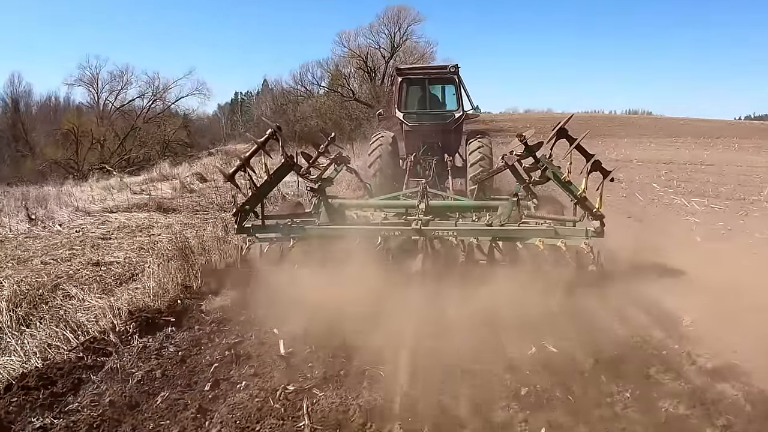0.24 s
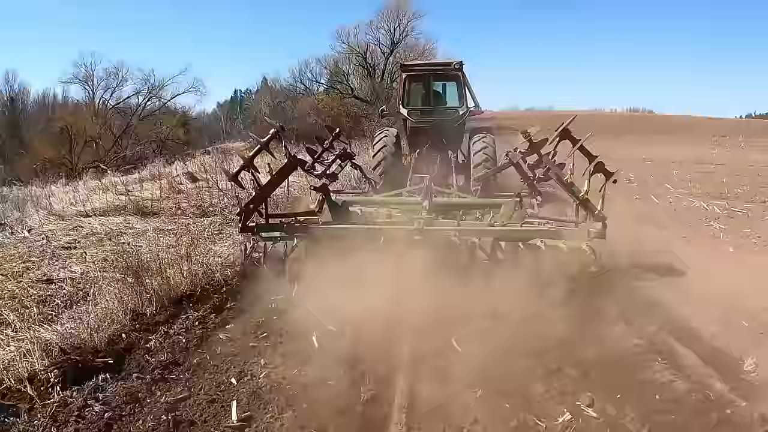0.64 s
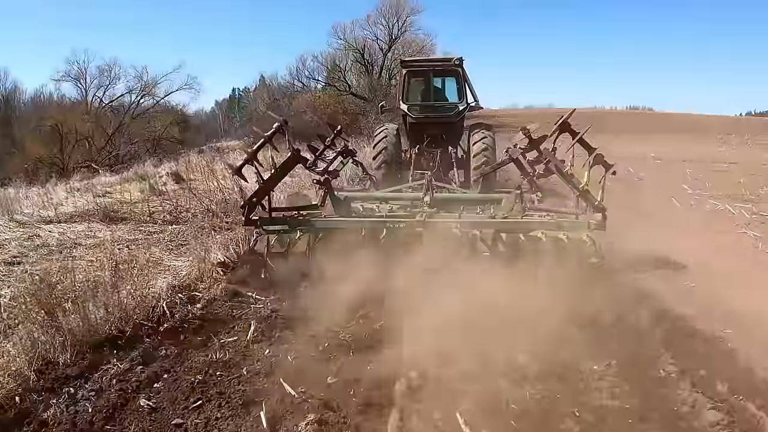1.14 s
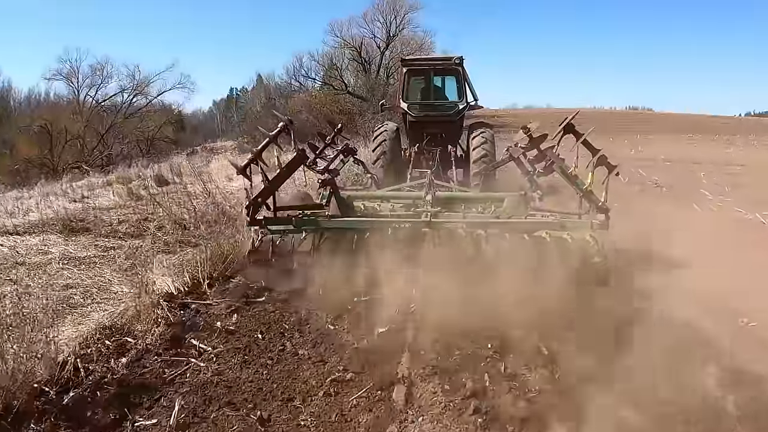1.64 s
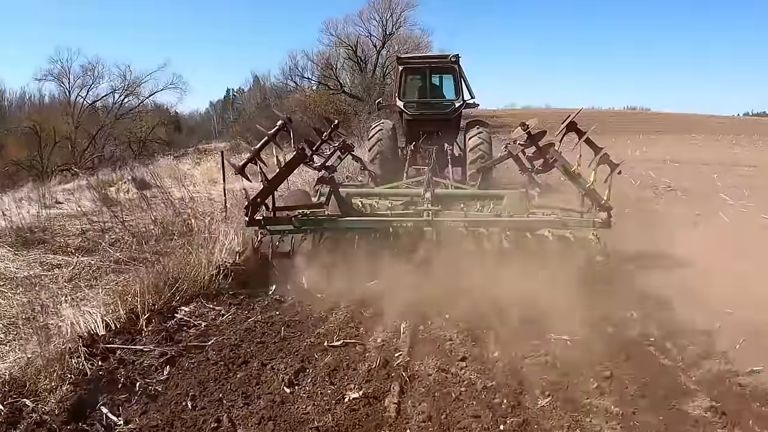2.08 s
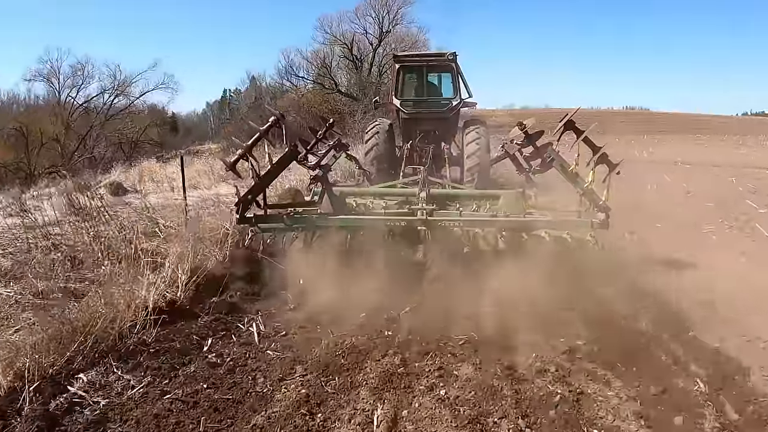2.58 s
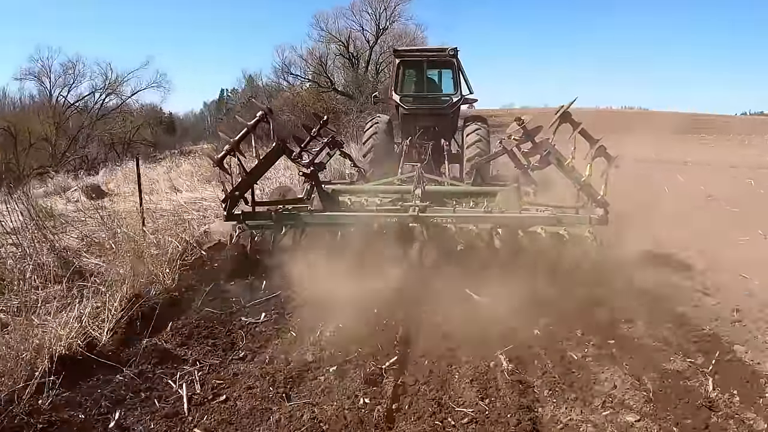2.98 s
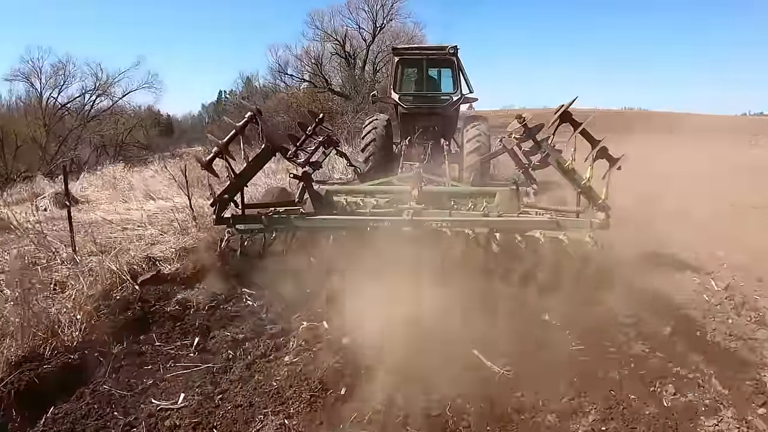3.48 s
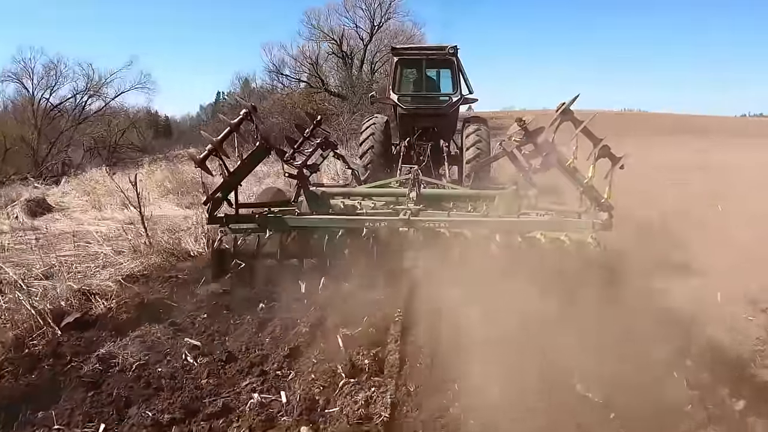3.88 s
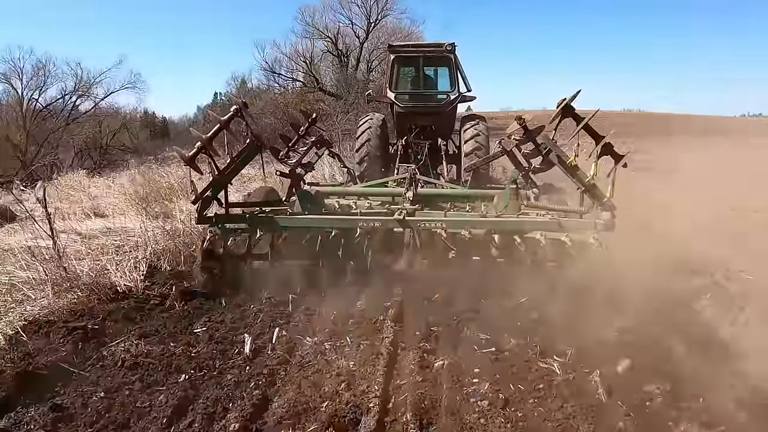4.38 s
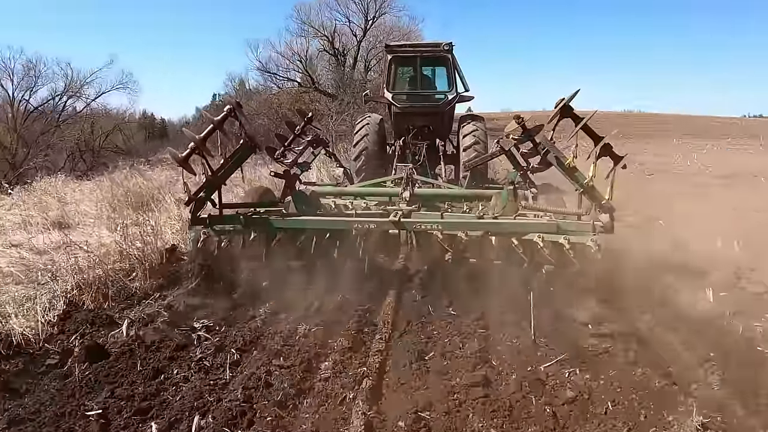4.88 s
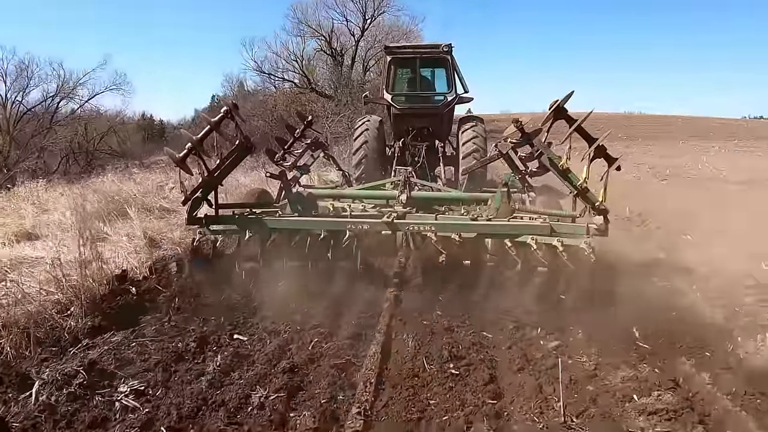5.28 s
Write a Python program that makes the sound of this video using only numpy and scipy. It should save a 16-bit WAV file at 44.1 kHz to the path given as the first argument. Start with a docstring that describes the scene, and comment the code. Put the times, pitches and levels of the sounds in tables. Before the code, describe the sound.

Continuous heavy engine hum with muffled clatter and faint whines underlies a nearby single-cylinder thump. Over it, gritty soil streams from a dragged disc harrow, fullest at first and sparser towards the end. Irregular hard knocks and tiny ticks run throughout; metallic clanks, crunching rasps and brief bearing squeaks come and go, then big stones thud dully near the end. Close moving stereo microphone in open air, no echo, slight wind.

```python
"""A diesel tractor drags a disc harrow over a dry field; the microphone follows on a small vehicle.
From the start the tractor's firing drone, clatter and whines beat against a one-cylinder engine picking up speed.
Filtered noise bursts pour off the discs as soil, thinning towards the end; pebbles tick and a little wind rumbles.
Noise bursts knock the frame throughout; from 0.3 s modal clanks, falling rasps, scraped discs and bearing squeaks
come and go. Around 4.6 s big stones bang dully against the gangs."""
import sys
import numpy as np
from scipy import signal
from scipy.fft import rfft, irfft, next_fast_len
from scipy.io import wavfile
from scipy.ndimage import uniform_filter1d, minimum_filter1d

SR = 44100
rng = np.random.default_rng(int(sys.argv[2]) if len(sys.argv) > 2 else 0)


def digitize_waveform(pressure):
    """Quantize a signal to 16-bit integers and store it at the path in sys.argv[1].

    Rows of a 2-D input are taken as channels; values are limited to [-1, 1].
    """
    field = np.atleast_2d(pressure).T
    bounded = np.clip(field, -1, 1)
    quanta = np.round(bounded * 32767).astype(np.int16)
    wavfile.write(sys.argv[1], SR, quanta)


N = 243873
TIME = np.arange(N) / SR

# soil running off the discs: time_s, level_db (each user adds its own offset)
SOIL_FLOW = [(0.0, -33.5), (0.63, -33), (1.77, -37), (2.02, -34.5), (2.28, -34), (3.05, -38), (3.7, -36.5),
             (4.02, -40.5), (4.67, -38), (5.53, -40)]
# transmission of a blow to the microphone: freq_hz, gain_db (relative)
BLOW_PATH = [(300, 8), (4500, -0.5), (7400, -1.5), (8600, -9.5), (11500, -13.5), (14000, -34)]
# frame resonances: freq_hz, width_hz, gain_db (relative)
FRAME_MODES = [(1444, 74, 7), (1780, 76, -3), (2050, 72, -1.5), (2484, 23, -2), (2840, 27, -1.5),
               (3444, 35, -1), (3957, 49, -0.5), (4520, 48, -1), (4960, 69, -10.5), (5370, 17, -3)]


def undb(db):
    """Decibels to gain."""
    return 10 ** (np.asarray(db) / 20)


def unit(x):
    """Scale to rms 1."""
    return x / np.sqrt(np.mean(x ** 2))


def curve(rows):
    """Join (time_s, value) rows by straight lines."""
    return np.interp(TIME, *np.transpose(rows))


def walk(rate_hz):
    """Smooth random curve, rms 1, changing about rate_hz times a second."""
    f = np.fft.rfftfreq(N, 1 / SR)
    spectrum = rfft(rng.standard_normal(N))
    return unit(irfft(spectrum * np.exp(-(f / rate_hz) ** 2), N))


def decay(t, t60_s):
    """Exponential decay, 60 dB down after t60_s."""
    return np.exp(-np.log(1000) * t / t60_s)


def shaped(x, response):
    """Filter by a response given as a function of frequency."""
    size = next_fast_len(len(x) + 4096)
    f = np.fft.rfftfreq(size, 1 / SR) + 1e-3  # avoids division by zero
    return irfft(rfft(x, size) * response(f), size)[:len(x)]


def colour(x, points):
    """Minimum-phase filter through (freq_hz, gain_db) points; output rms 1."""
    hz, db = np.transpose(points)
    size = 2 * next_fast_len(len(x) // 2 + 4096)
    log_hz = np.log(np.fft.rfftfreq(size, 1 / SR) + 1)
    gain = undb(np.interp(log_hz, np.log(hz), db))
    cepstrum = irfft(np.log(gain))[:size // 2]
    cepstrum[1:] *= 2  # folded cepstrum: causal response
    response = np.exp(rfft(cepstrum, size))
    return unit(irfft(rfft(x, size) * response)[:len(x)])


def bell(x, hz, q):
    """One second-order band-pass resonance."""
    return shaped(x, lambda f: 1 / (1 + 1j * q * (f / hz - hz / f)))


def double_bell(x, hz, q):
    """Two equal resonances in series."""
    return bell(bell(x, hz, q), hz, q)


def ring(x, modes):
    """Drive parallel modes of (freq_hz, width_hz, gain_db)."""
    def response(f):
        return sum(undb(db) / (1 + 1j * (f * f - hz * hz) / (f * width)) for hz, width, db in modes)
    return shaped(x, response)


def add(out, start_s, x, pan=0.):
    """Mix a sound in at start_s; positive pan leans left."""
    start = max(int(start_s * SR), 0)
    x = x[:N - start]
    out[:, start:start + len(x)] += np.outer([1 + pan, 1 - pan], x)


def spread(mid, side, side_db, left_db):
    """Left and right from a shared and an opposed part."""
    side = undb(side_db) * side
    return np.array([(mid + side) * undb(left_db / 2), (mid - side) * undb(-left_db / 2)])


def crumbs(per_second, scatter_db, tail_s):
    """Random noise bursts, a few much bigger; energy falls by 1/e in tail_s."""
    chance = rng.random(N)
    sizes = undb(scatter_db * np.minimum(rng.exponential(size=N), 4.5))
    breaks = (chance < per_second / SR) * sizes ** 2
    energy = signal.lfilter([1], [1, -np.exp(-1 / (tail_s * SR))], breaks)
    return unit(np.sqrt(energy + 1e-12) * rng.standard_normal(N))


def exhaust(firing, waver=0.24, firing_waver=0.035, lope=0.022):
    """The tractor's stack booms at the firing rate, loping once every six firings; overtones waver."""
    # tractor load: time_s, exhaust_level_db
    load = [(0, -16.5), (1, -16.5), (2.2, -15), (5.53, -15.5)]
    # exhaust lines: multiple_of_firing_rate, level_db (relative)
    lines = [(1, -2), (2, -30), (3, -25.5), (4, -45.5), (5, -35), (6, -53), (7, -35.5)]
    out = firing_waver * walk(31) * np.sin(2 * np.pi * firing)  # quadrature part: unsteady phase
    for k, db in lines:
        unsteady = firing_waver if k == 1 else waver
        out = out + undb(db) * (1 + unsteady * walk(12.0)) * np.cos(2 * np.pi * k * firing)
    cylinders = np.cos(2 * np.pi * firing / 6)
    return unit(out * (1 + lope * cylinders)) * undb(curve(load))


def machinery(firing, clatter_db=-29, beat=0.047, whine_db=-1):
    """Combustion clatter pulses with each firing; gear and fan whines follow the engine speed."""
    # engine rumble and clatter: freq_hz, density_db_per_hz (relative)
    clatter_spectrum = [(20, -24), (35, -4.5), (60, 5), (100, 11), (170, -1), (280, 5.5), (380, -2.5),
                        (700, -3.5), (850, -8), (1000, -3), (1900, -10), (3500, -35), (9000, -49.5)]
    # gear and fan whines: mean_pitch_hz, rms_db (before whine_db)
    whines = [(175.6, -38.5), (419, -46.5), (716, -49), (912, -46.5), (1496, -47.5)]
    gate = 1 + beat * np.cos(2 * np.pi * firing)
    mid, side = (colour(rng.standard_normal(N) * gate, clatter_spectrum) for _ in range(2))
    clatter = spread(mid, side, side_db=-16.0, left_db=-1.5) * undb(clatter_db + .5 * walk(4.3))
    engine_time_s = firing / firing[-1] * TIME[-1]  # time warped by engine speed
    whine = 0
    for hz, db in whines:
        level = undb(db + 2 * walk(1.8))
        whine = whine + level * unit(np.cos(2 * np.pi * hz * engine_time_s + 2.46 * walk(4.4)))
    return clatter + undb(whine_db) * whine


def putter(putter_db=-23, hunt_hz=0.04, chamber_hz=100, chamber_q=2.35, scatter_db=.5, first_puff_s=.02):
    """A single cylinder thumps through its silencer, each firing a little different in time and strength."""
    # small engine speed: time_s, firing_rate_hz
    speed = [(0, 15.04), (.4, 16.43), (.8, 16.63), (1.3, 16.7), (2, 16.865), (2.6, 16.58), (3.3, 17.1),
             (3.8, 16.915), (4.4, 16.64), (5, 16.53), (5.53, 16.53)]
    # silencer response: freq_hz, gain_db (relative)
    silencer = [(17, -31), (33.5, -6), (50, -13.5), (67, -5), (84, -2.5), (100, -5.5), (117, -2),
                (133, -3.5), (150, -8.5), (167, -21.5), (200, -21), (250, -30), (400, -38.5), (1500, -62.5)]
    turns = np.cumsum(curve(speed) + hunt_hz * walk(6.2)) / SR - first_puff_s * speed[0][1]
    count = np.floor(turns)
    pulses = np.diff(count, prepend=count[0]) * undb(scatter_db * walk(22.0))
    puffs = shaped(pulses - pulses.mean(), lambda f: 1 / (1 + 1j * f / 900) ** 2)  # soft gas release
    puffs = puffs - 2 * bell(puffs, chamber_hz, chamber_q)  # chamber delays and draws out part of each puff
    return colour(puffs, silencer) * undb(putter_db)


def soil(soil_db=0.56, patter_db=-7, crackle_db=-9, crackle_hz=1900, treble_hz=5000, brighten=0.38):
    """Dry soil pours off the discs, brighter with more flow; clods patter on the frame, stalks crackle."""
    # soil hiss: freq_hz, density_db_per_hz (relative)
    hiss_spectrum = [(400, 6), (900, 6), (1600, 7.5), (2400, 5), (3000, 3.5), (4000, 3), (5500, -3),
                     (7400, -7.5), (8500, -13.5), (10200, -18.5), (12200, -27), (14000, -51)]
    flow_db = curve(SOIL_FLOW)
    mid, side = (colour(crumbs(per_second=1300, scatter_db=6.0, tail_s=0.019), hiss_spectrum) for _ in range(2))
    treble = shaped(mid, lambda f: 1 / (1 + (treble_hz / f) ** 4))
    mid = mid + treble * (undb(brighten * (flow_db - flow_db.mean())) - 1)
    hiss = spread(mid, side, side_db=-9.5, left_db=-1.0)
    clods = crumbs(per_second=63, scatter_db=5.0, tail_s=0.0027)
    patter = colour(bell(bell(clods, 1570, 1.0), 1570, 0.99), BLOW_PATH)
    stalks = crumbs(per_second=280, scatter_db=2.0, tail_s=0.00046)
    crackle = colour(bell(stalks, crackle_hz, 1.2), BLOW_PATH)
    level = undb(flow_db + soil_db + .5 * walk(1.5))
    return (hiss + undb(patter_db) * patter + undb(crackle_db) * crackle) * level


def jolts(per_second=2.4, over_flow_db=7, centre_hz=(1500, 3600), t60_s=(0.051, 0.2)):
    """Rows for blows(): light knocks at random moments, stronger when more soil runs."""
    flow_db, rows = curve(SOIL_FLOW), []
    for when, pitch, rattle in rng.random(size=(int(per_second * TIME[-1]), 3)):
        db = flow_db[int(when * N)] + over_flow_db
        hz = np.interp(pitch, [0, 1], centre_hz)
        rows.append((when * TIME[-1], db, hz, np.interp(rattle, [0, 1], t60_s)))
    return rows


def blows(rows, gain_db, q, strike):
    """A hard strike and decaying chatter, heard directly and through the frame's resonances."""
    # a long rattle damps the frame's ring; a soft clod (centre below hard_hz) hardly excites it
    base_ring_db, damp_db_per_s, hard_hz, soft_db_per_octave = 4.5, 44, 1900, 15
    out, t = np.zeros((2, N)), TIME[:SR // 4]
    for start_s, db, hz, t60_s in rows:
        chatter = rng.standard_normal(len(t)) * decay(t, max(t60_s, .005))
        chatter *= 1 + strike * np.exp(-t / 0.0025)
        contact = colour(double_bell(chatter, hz, q), BLOW_PATH)
        octaves_soft = max(np.log2(hard_hz / hz), 0)
        ring_db = base_ring_db - damp_db_per_s * t60_s - soft_db_per_octave * octaves_soft
        sound = contact + undb(ring_db) * unit(ring(contact, FRAME_MODES))
        onset_rms = np.std(sound[:SR // 100])
        add(out, start_s, sound / onset_rms * undb(db + gain_db), pan=rng.uniform(-0.37, .1))
    return out


def knocks():
    """Stones and clods knock on the frame, listed and random blows together."""
    # listed knocks: start_s, level_db (before gain_db), centre_hz, rattle_t60_s
    listed = [(.032, -17.5, 2730, 0.13), (.367, -17, 4730, 0.1), (.658, -27, 8000, 0.04),
              (.674, -22, 3700, 0.055), (.705, -19.5, 3000, 0.09), (.748, -24, 2600, .05),
              (.871, -20, 2000, .1), (.93, -19.5, 2000, .07), (1.088, -25, 2970, 0.65),
              (1.141, -25, 6000, .06), (1.505, -23, 5000, 0.12), (1.783, -18.5, 2000, 0.41),
              (1.83, -23, 3850, 0.031), (2.255, -23, 3700, 0.08), (2.406, -19.5, 3700, 0.02),
              (2.439, -20.5, 2200, 0.038), (2.485, -28.5, 3200, .06), (2.645, -38, 3900, 0.045),
              (3.568, -24, 3900, 0.058), (3.656, -21, 3000, 0.049), (3.675, -18.5, 3430, 0.084),
              (3.958, -25, 3800, .06), (4.243, -26.5, 4000, 0.054), (4.308, -24.5, 3000, 0.056),
              (4.338, -26, 4560, 0.06), (4.406, -23.5, 2500, 0.055), (4.527, -20, 2780, 0.018),
              (4.663, -27, 4300, 0.072), (4.925, -21.5, 1500, 0.29), (5.098, -23, 2180, 0.14),
              (5.122, -28.5, 5000, 0.1)]
    return blows([*listed, *jolts()], gain_db=-8.0, q=0.7, strike=0.39)


def pebbles(pebble_db=3, scatter_db=3, t60_s=0.056, low_hz=1000, high_hz=4000, overtone=1.9, overtone_db=-5):
    """Pebbles and dry stalks tick against the steel at random, each with a short two-note ring."""
    out, t, flow_db = np.zeros((2, N)), TIME[:SR // 10], curve(SOIL_FLOW)
    for when, pitch, size, side in rng.random(size=(130, 4)):
        hz = low_hz * (high_hz / low_hz) ** pitch
        tone = np.sin(2 * np.pi * hz * t) + undb(overtone_db) * np.sin(2 * np.pi * hz * overtone * t)
        tick = tone * decay(t, t60_s) * np.sqrt(low_hz / hz)  # higher is weaker
        db = flow_db[int(when * N)] + pebble_db + scatter_db * (2 * size - 1)
        add(out, when * TIME[-1], tick * undb(db), pan=(side - .5) / 2)
    return out


def clanks(q=1.4, place_db=3, chatter_db=-7, chatter_t60_s=.13, rise_s=.0006, bounce_s=.005, bounce_db=-5,
           detune=.018):
    """Steel hits steel and rings the frame; the loose joint rebounds, each rebound a little out of tune."""
    # clanks: start_s, level_db, centre_hz, place_struck_0_to_1, pitch_ratio_of_member
    strikes = [(0.303, -23, 2480, 0.76, 0.93), (.398, -19.5, 2330, 0.56, 0.98),
               (1.948, -22, 3480, 0.75, 0.99), (2.054, -27, 3270, 0.37, 0.97),
               (3.259, -24.5, 2060, 0.83, 1)]
    out, t = np.zeros((2, N)), TIME[:SR // 4]
    for start_s, db, hz, place, tuning in strikes:
        sound, contact_s = 0, 0
        for bounce in range(4):
            age = np.maximum(t - contact_s, 0)
            for k, (mode_hz, width_hz, mode_db) in enumerate(FRAME_MODES):
                level_db = mode_db + bounce * bounce_db + place_db * np.cos(np.pi * k * place)
                gain = undb(level_db) / np.hypot(1, q * (mode_hz / hz - hz / mode_hz))
                pitch_hz = mode_hz * tuning * (1 + detune * min(bounce, 1) * rng.standard_normal())
                envelope = np.exp(-np.pi * width_hz * age) * (1 - np.exp(-age / rise_s))
                sound = sound + gain * envelope * np.sin(2 * np.pi * (pitch_hz * age + rng.random()))
            contact_s += bounce_s * rng.uniform(.5, 2)
        chatter = rng.standard_normal(len(t)) * decay(t, chatter_t60_s)
        sound = unit(sound) + undb(chatter_db) * colour(double_bell(chatter, hz, q), BLOW_PATH)
        onset_rms = np.std(sound[:SR // 100])
        add(out, start_s, sound / onset_rms * undb(db), pan=rng.uniform(-0.3, 0))
    return out


def rasps(rasp_db=0, q=2.8, fall_octaves=0.39, grit_db=-4, lean=0.58):
    """A hard clod is crushed in a run of tiny slips; its resonance falls as the disc rolls over it."""
    # rasps: start_s, length_s, level_db, starting_resonance_hz
    clods = [(0.478, 0.046, -30, 1970), (.515, 0.1, -32, 1750), (0.602, 0.03, -31.5, 2100),
             (1.083, 0.035, -30.5, 2270), (1.13, .12, -31, 1830), (1.25, 0.07, -34, 2000),
             (2.07, 0.09, -36.5, 2080), (2.166, .06, -36.5, 3030), (2.812, 0.043, -35.5, 2420),
             (3.64, 0.026, -32.5, 2230), (3.792, 0.017, -32.5, 2220), (4.899, 0.055, -35.5, 1580),
             (5.09, .06, -35.5, 2000)]
    out, grit = np.zeros((2, N)), crumbs(per_second=500, scatter_db=1.0, tail_s=0.00076)
    for start_s, length_s, db, hz in clods:
        n = int(length_s * SR)
        along = np.linspace(0, 1, n)
        slips = np.roll(grit, -int(start_s * SR))[:n]
        read_at = np.cumsum(2 ** (-fall_octaves * along))  # slowing read-out lowers the pitch
        body = np.interp(read_at, np.arange(n), double_bell(slips, hz, q))
        sound = unit(body) + undb(grit_db) * colour(bell(slips, hz, 0.73), BLOW_PATH)
        envelope = np.sin(np.pi * along ** lean)
        add(out, start_s, unit(sound * envelope) * undb(db + rasp_db), pan=rng.uniform(-0.34, 0))
    return out


def scrapes(scrape_db=0, q=0.66, bend=0.005, top_hz=12300, catch_db=2.0, swell=0.74, lean=0.69,
            grit_per_s=450, grit_db=3):
    """A stone grinds along a disc and drives its modes; the shifting contact bends their pitch."""
    # scrapes: start_s, length_s, level_db, ring_centre_hz, rear_gang_share_0_to_1, grind_over_ring_db
    drags = [(0.496, 0.13, -33, 4600, 0.1, -7), (2.22, 0.82, -54, 9500, .9, -20),
             (2.238, 0.056, -39, 8000, 0.5, -5), (2.4, 0.14, -38.5, 11000, 0.7, -12),
             (2.594, 0.13, -49, 11000, .8, -18), (2.604, 0.14, -35.5, 1500, 1, -12),
             (2.818, 0.1, -46.5, 9000, 0.4, -3), (3.669, 0.044, -40, 7500, 0, -15),
             (3.725, .11, -44, 7000, 0, -15)]
    # disc modes: freq_hz, width_hz, gain_db (relative)
    front_disc = [(1300, 59, 9), (2000, 52, 2), (3820, 96, 0.5), (5650, 64, 6), (6640, 90, -3),
                  (8600, 110, -9), (9800, 70, -6), (9800, 110, -24), (11900, 250, -15)]
    # disc modes: freq_hz, width_hz, gain_db (relative)
    rear_disc = [(1970, 16, 12.5), (3900, 80, 8.5), (7200, 340, -6), (9970, 18, 2), (9500, 690, -13),
                 (10650, 120, -15), (11930, 130, -5)]
    out, t = np.zeros((2, N)), TIME[:SR]
    grit, shift, catching = walk(grit_per_s), walk(20.5), walk(40)
    for start_s, length_s, db, hz, rear, grind_db in drags:
        now = slice(int(start_s * SR), int(start_s * SR) + len(t))
        along = np.minimum(t / length_s, 1)
        pressure = np.abs(np.sin(np.pi * along ** lean)) ** swell
        grip = undb(grit_db * grit[now] + catch_db * catching[now])
        friction = pressure * rng.standard_normal(len(t)) * grip
        drive = shaped(bell(friction, hz, q), lambda f: 1 / (1 + (f / top_hz) ** 16))
        ringing = (1 - rear) * ring(drive, front_disc) + rear * ring(drive, rear_disc)
        sound = unit(ringing) + undb(grind_db) * colour(drive, BLOW_PATH)
        sound = np.interp(t + bend * np.cumsum(shift[now]) / SR, t, sound)
        scrape_rms = np.std(sound[:int(length_s * SR)])
        add(out, start_s, sound / scrape_rms * undb(db + scrape_db), pan=rng.uniform(-0.17, 0.088))
    return out


def squeaks(squeak_db=-5.0, jitter=0.0084, second_db=-6, third_db=-4, catch_db=4, lean=0.65):
    """A dry bearing sticks and slips: a short, jittery, broken glide with one or two overtones."""
    # squeaks: start_s, length_s, starting_pitch_hz, level_db (before squeak_db), glide_hz_per_s
    glides = [(0.755, 0.04, 4990, -36, 198), (0.937, 0.078, 4270, -36, -1500),
              (1.388, 0.1, 4300, -41, 2495), (2.153, 0.054, 2990, -31.5, -2),
              (2.886, 0.12, 3980, -40, 1800), (3.579, 0.11, 4210, -34, 900), (5.265, 0.096, 4220, -40, 600)]
    out, wobble, grip = np.zeros((2, N)), walk(220), unit(undb(catch_db * walk(90)))
    for start_s, length_s, start_hz, db, glide in glides:
        n = int(length_s * SR)
        hz = (start_hz + glide * TIME[:n]) * (1 + jitter * np.roll(wobble, -int(start_s * SR))[:n])
        phase = 2 * np.pi * np.cumsum(hz) / SR
        tone = np.sin(phase) + undb(second_db) * np.sin(2 * phase)
        if start_hz < 3500:
            tone = tone + undb(third_db) * np.sin(3 * phase)
        envelope = np.sin(np.pi * np.linspace(0, 1, n) ** lean)
        add(out, start_s, tone * envelope * undb(db + squeak_db))
    return out * grip


def bangs(crunch_db=-4, crunch_q=.6, rise_s=.0007, pan=.1):
    """A big stone hits a gang: a full, dull, quickly damped ring with a crunch of soil."""
    # bangs: start_s, level_db, pitch_hz, t60_s
    stones = [(4.544, -20.5, 1170, .04), (4.656, -21, 1200, .045), (4.661, -24.5, 1750, .035),
              (4.669, -29, 1250, .04)]
    # ring of a bang: multiple_of_pitch, level_db (relative)
    modes = [(.45, -7), (.78, -4), (1, 0), (1.37, -4), (1.65, -6), (2.03, -9), (2.43, -14), (3.6, -21)]
    out, t = np.zeros((2, N)), TIME[:SR // 8]
    for start_s, db, hz, t60_s in stones:
        body = sum(undb(mode_db) * np.sin(2 * np.pi * (ratio * hz * t + rng.random())) for ratio, mode_db in modes)
        crunch = colour(double_bell(rng.standard_normal(len(t)), hz, crunch_q), BLOW_PATH)
        envelope = decay(t, t60_s) * (1 - np.exp(-t / rise_s))
        sound = (unit(body) + undb(crunch_db) * crunch) * envelope
        onset_rms = np.std(sound[:SR // 100])
        add(out, start_s, sound / onset_rms * undb(db), pan=-pan)
    return out


def wind(wind_db=-43, gust_db=4):
    """Moving air rumbles faintly and independently on each microphone port."""
    ports = [unit(double_bell(rng.standard_normal(N), 28, 0.95)) for _ in range(2)]
    return np.array(ports) * undb(wind_db + gust_db * walk(1.8))


def scene():
    """The tractor, the harrow and the small engine, in open air."""
    # tractor speed, sagging a little under load: time_s, firing_rate_hz
    firing_rate = [(0, 98.38), (1.2, 98.56), (1.6, 97.86), (2.9, 97.67), (3.6, 97.3), (4.5, 97.14),
                   (5.53, 97.63)]
    firing = np.cumsum(curve(firing_rate)) / SR  # running count of firings
    engines = exhaust(firing) + machinery(firing) + putter()
    harrow = soil() + knocks() + pebbles() + clanks() + rasps() + scrapes() + squeaks() + bangs()
    return engines + harrow + wind()


def record(dry, ceiling=0.58, hold_s=0.012, top_hz=14100):
    """The left port lags in phase; the recorder holds down the highest peaks and cuts above top_hz."""
    # phase between the microphone ports: freq_hz, left_lead_rad
    ports = [(0, 0), (600, -.1), (2500, -0.5), (6000, -0.47), (9500, -0.37), (14000, 0)]
    allowed = ceiling / np.maximum(np.abs(dry).max(axis=0), ceiling)
    hold = int(hold_s * SR)
    dry = dry * uniform_filter1d(minimum_filter1d(allowed, hold), hold)
    hz, lead_rad = np.transpose(ports)
    left = shaped(dry[0], lambda f: np.exp(1j * np.interp(f, hz, lead_rad)))
    low_pass = signal.ellip(8, .2, 70, top_hz, fs=SR, output="sos")
    return signal.sosfilt(low_pass, [left, dry[1]])


dry = scene()
out = record(dry)
digitize_waveform(out)
```